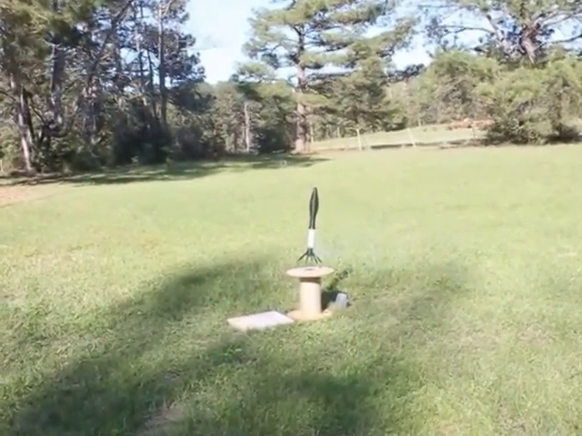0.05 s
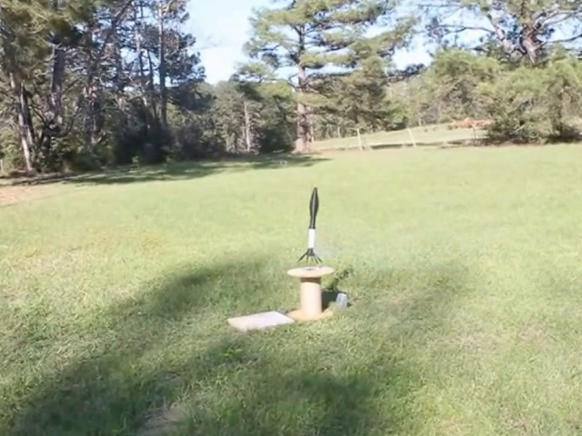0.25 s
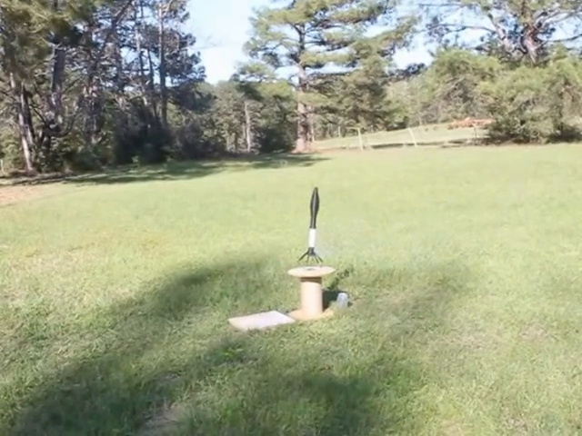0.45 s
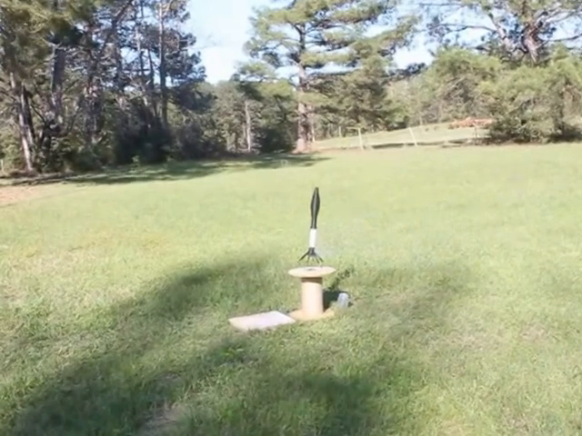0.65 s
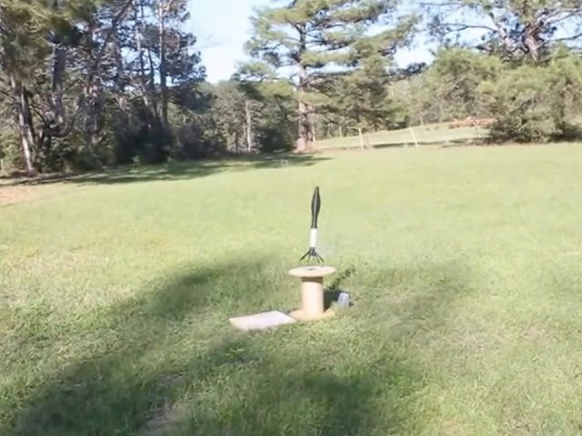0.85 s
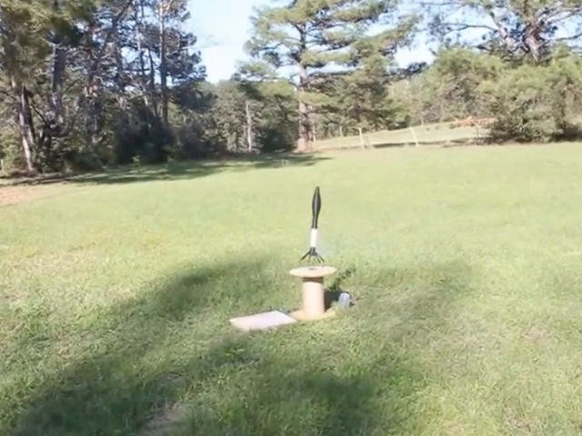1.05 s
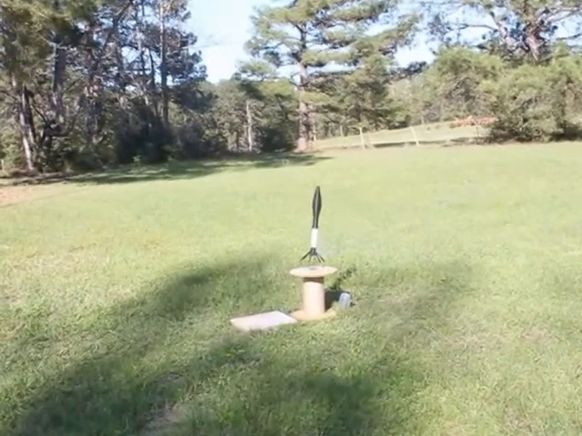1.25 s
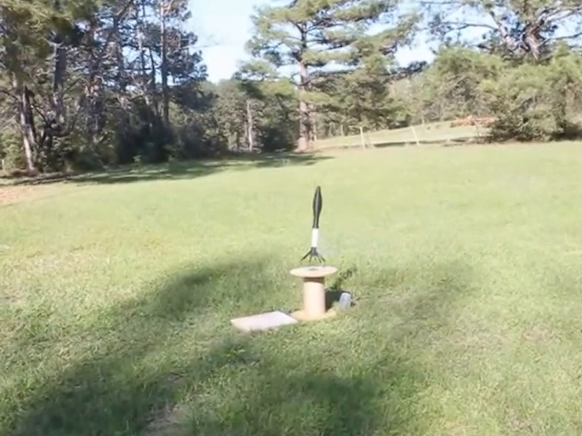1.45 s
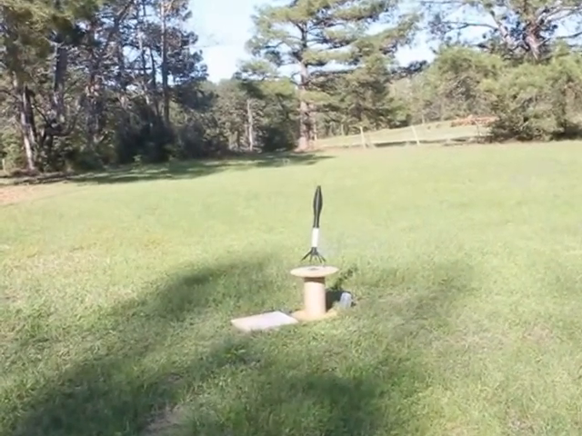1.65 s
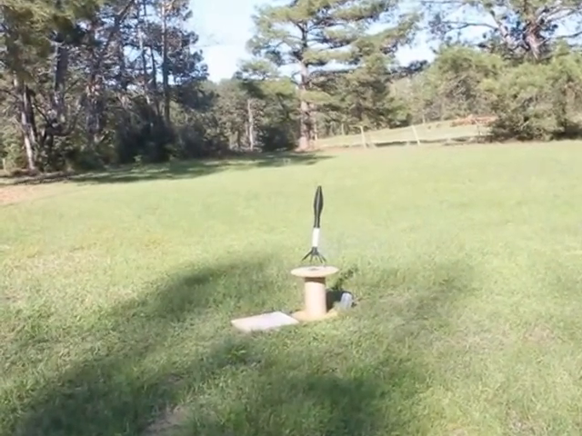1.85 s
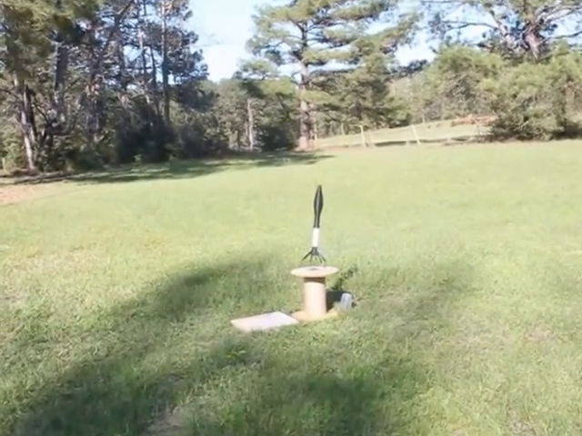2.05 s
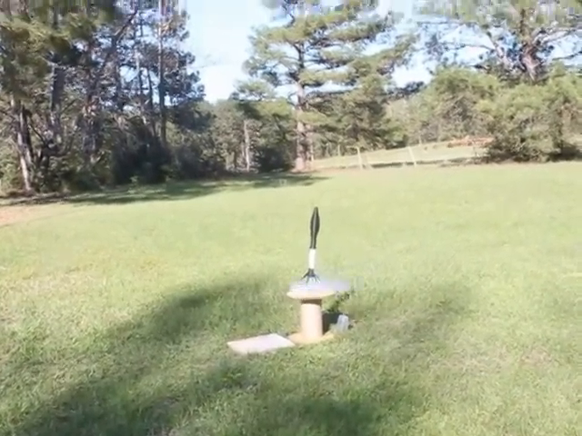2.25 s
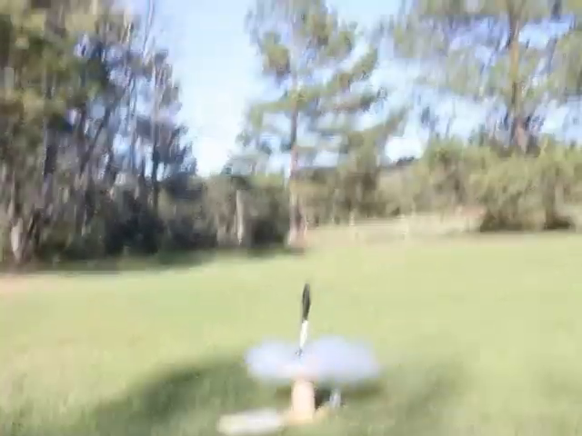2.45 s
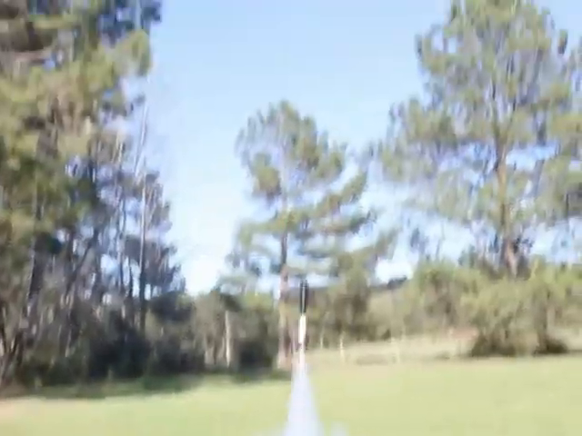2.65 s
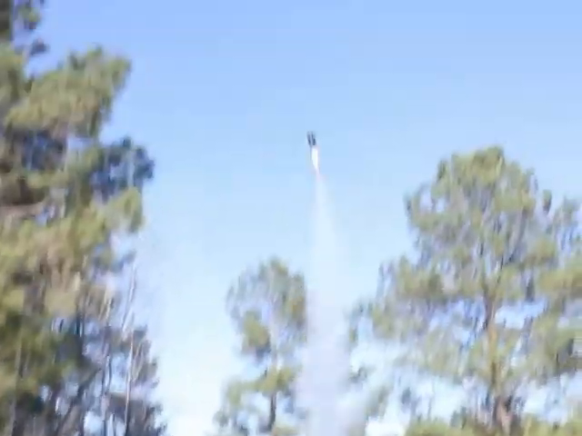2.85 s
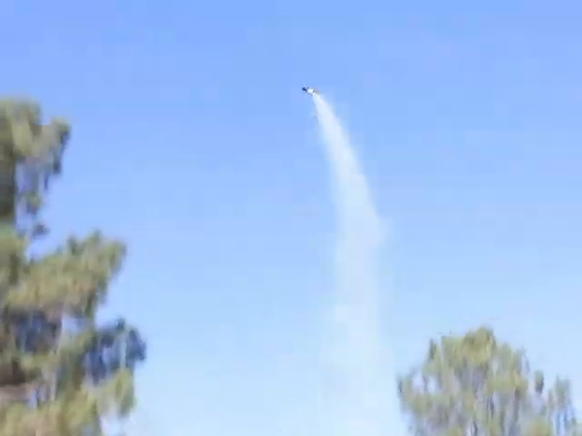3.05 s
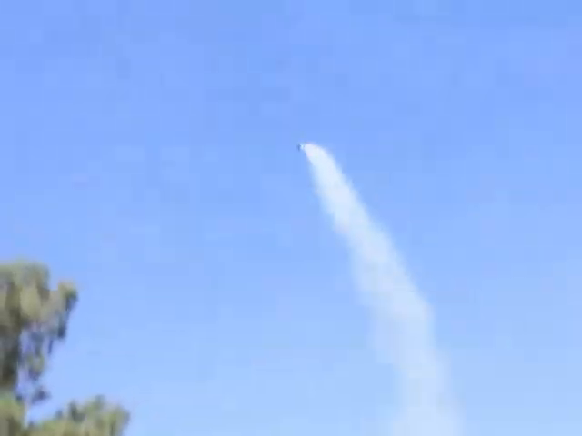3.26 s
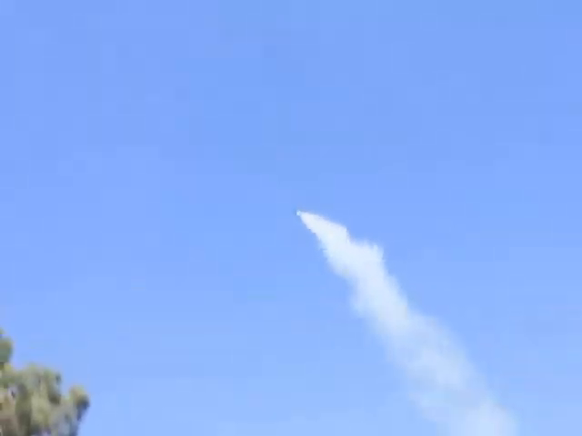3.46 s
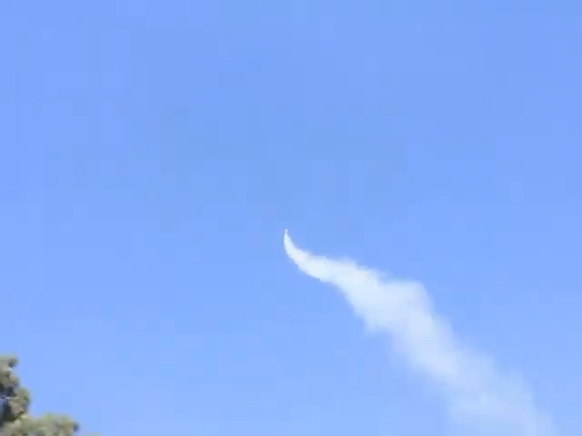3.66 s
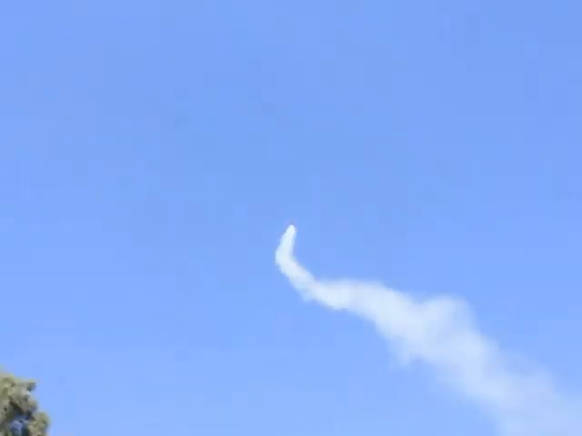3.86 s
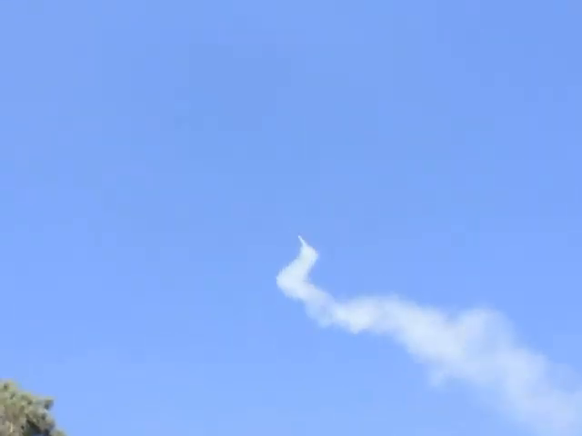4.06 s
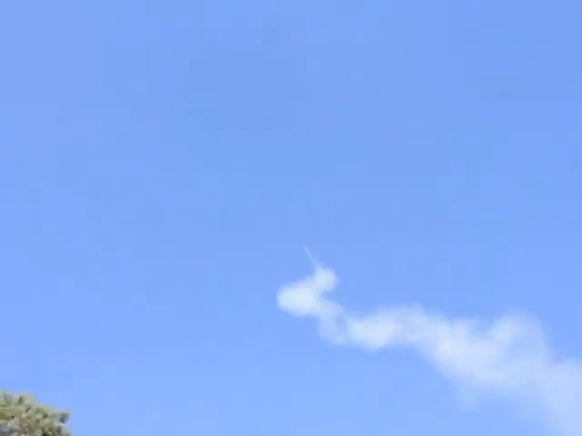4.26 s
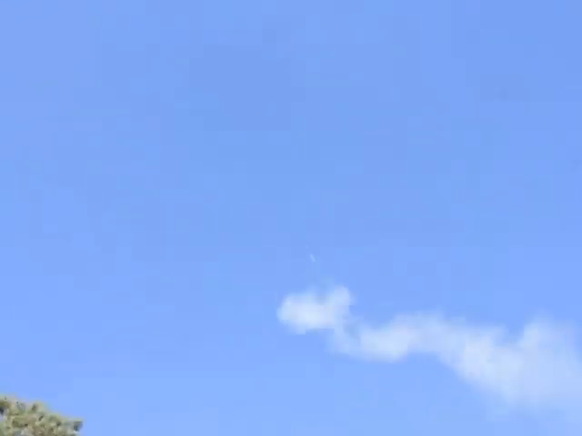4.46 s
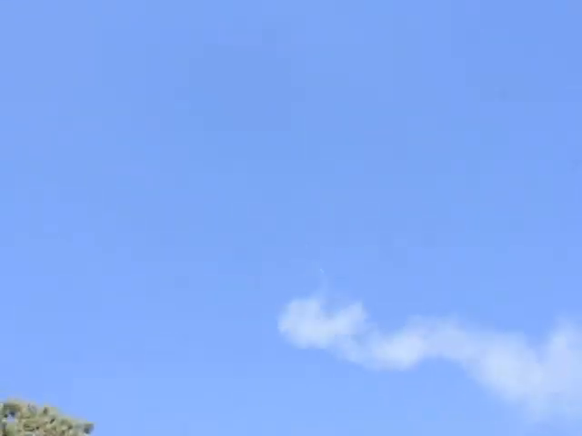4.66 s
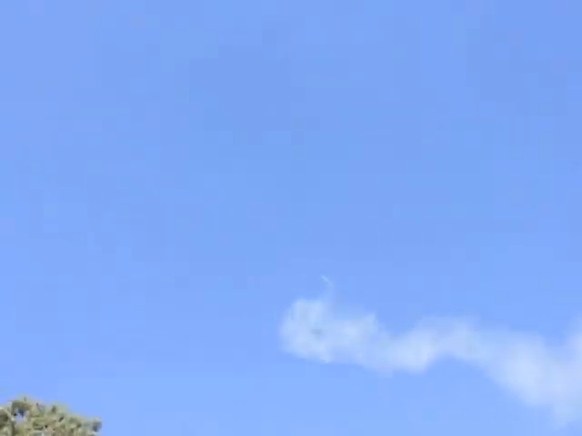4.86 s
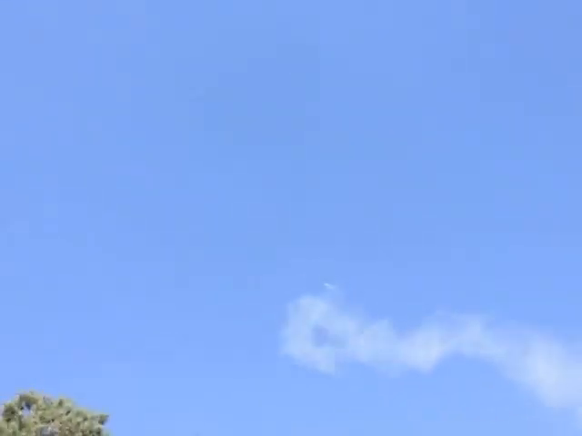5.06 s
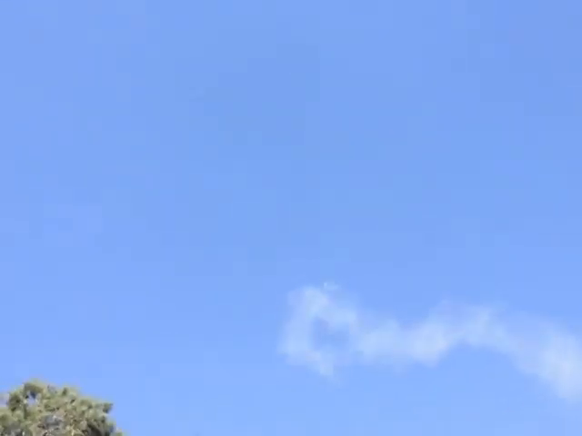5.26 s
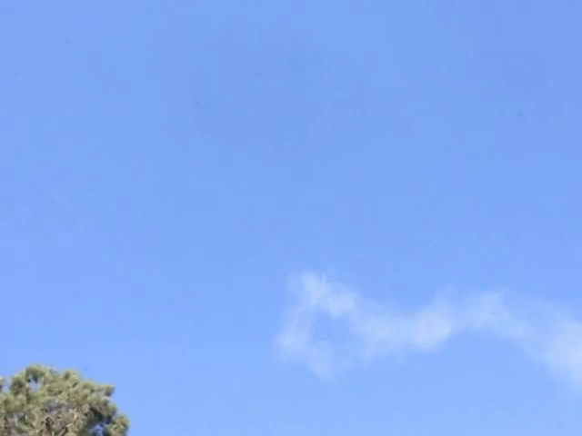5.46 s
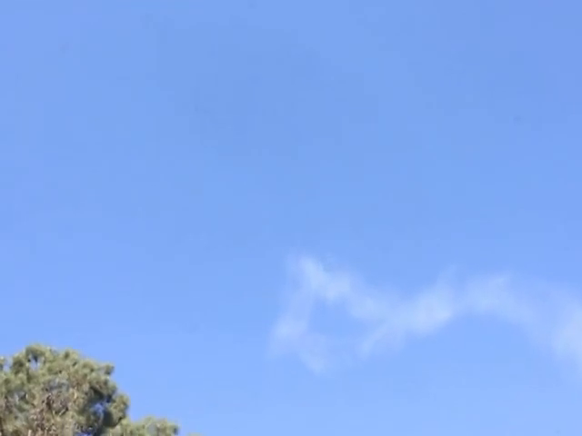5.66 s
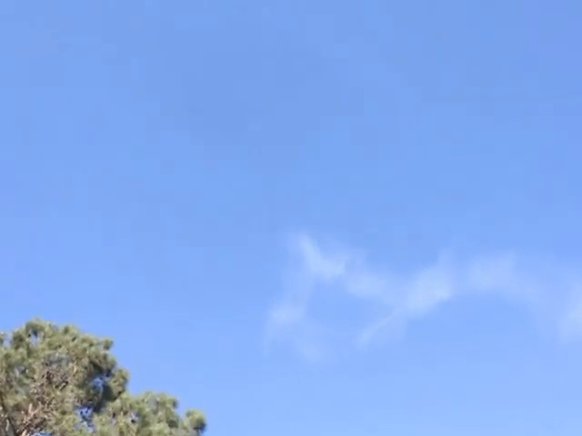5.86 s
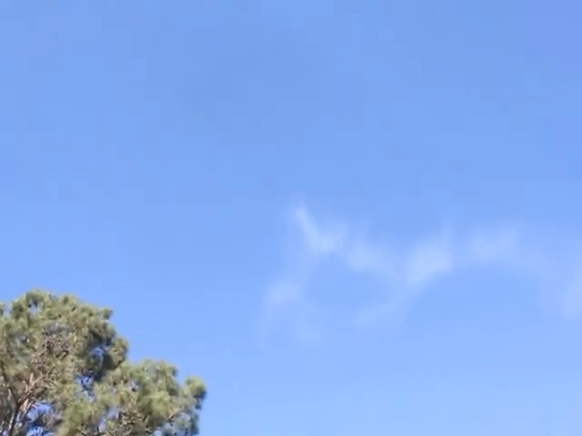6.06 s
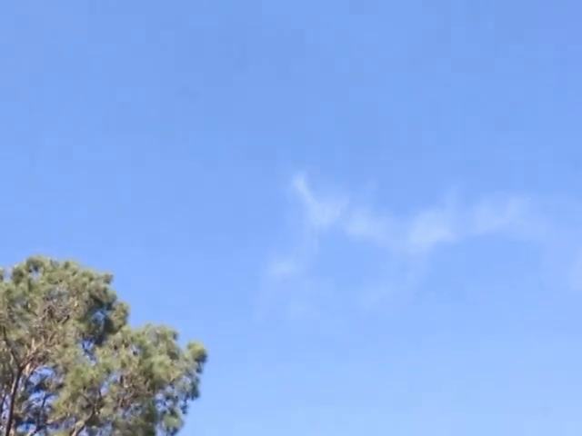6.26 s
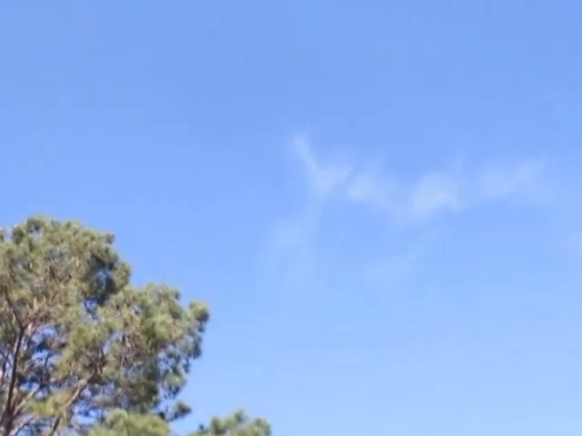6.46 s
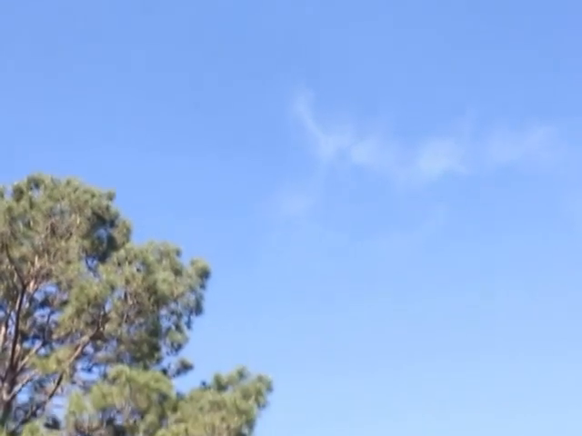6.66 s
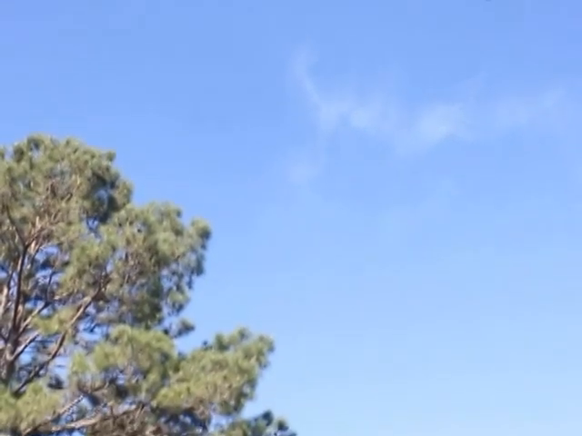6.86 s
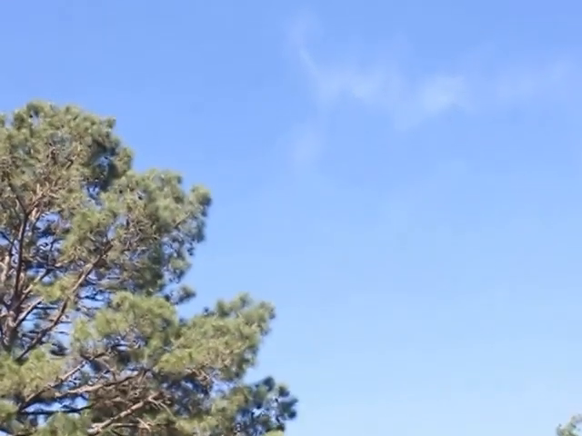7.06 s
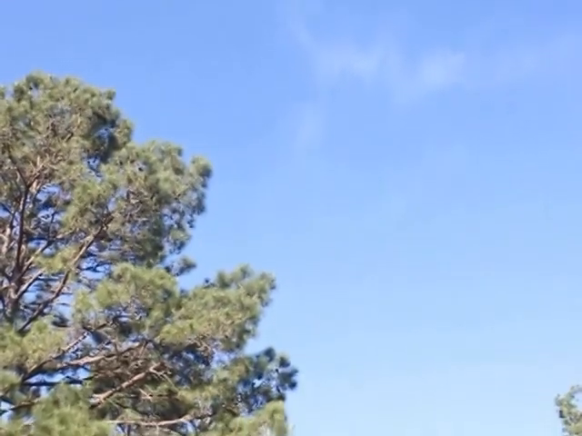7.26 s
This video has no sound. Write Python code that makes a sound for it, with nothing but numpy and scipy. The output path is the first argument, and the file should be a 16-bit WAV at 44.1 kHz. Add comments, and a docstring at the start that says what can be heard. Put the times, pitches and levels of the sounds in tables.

```python
"""A meadow: insects shrill in the grass, trees rustle, gusts buffet the microphone, camera electronics buzz.
At about 2.1 s a small rocket motor lights on its pad, roars, lifts off with low whooshes and hisses away.
The meadow sinks under the burn; a softer roar returns from the tree line and the meadow climbs back.
Near branches swell late on and two taps knock the camera. Shaped noise makes all but the buzz, a repeated
cycle of partials, and the knocks, clicks ringing resonances."""
import sys
import numpy as np
from scipy import signal
from scipy.fft import rfft, irfft, next_fast_len
from scipy.io import wavfile

SR = 44100
rng = np.random.default_rng(int(sys.argv[2]) if len(sys.argv) > 2 else 0)


def dump(signal):
    """Clip the signal to [-1, 1] and save it as 16-bit WAV at the path in sys.argv[1]."""
    limited = np.clip(np.atleast_2d(signal).T, -1, 1)
    pcm = np.round(limited * 32767).astype(np.int16)
    wavfile.write(sys.argv[1], SR, pcm)


N = 322756

# Start and end of lift-off: the roar trades its pad colour for that of the free jet [t/s, t/s]
LIFT_OFF_SPAN = (2.45, 2.73)
MEADOW_BACK_S = 5.24   # the meadow is back at full level


def from_db(db):
    """Decibels to gain."""
    return 10 ** (np.asarray(db) / 20)


def rms_one(x):
    """Scale to unit rms."""
    return x / np.sqrt(np.mean(x ** 2) + 1e-20)


def seconds():
    """Time of every sample."""
    return np.arange(N) / SR


def in_time(rows, **ends):
    """Columns of a curve table, sample by sample."""
    times, *columns = np.transpose(rows)
    return [np.interp(seconds(), times, column, **ends) for column in columns]


def at_hz(points, hz):
    """A spectrum read on a log-frequency axis."""
    point_hz, point_db = np.transpose(points)
    return np.interp(np.log(hz), np.log(point_hz), point_db)


def drift(corner_hz):
    """Slow chance with spread 1: noise through two equal low-pass poles, made at SR / 40."""
    r = np.exp(-80 * np.pi * corner_hz / SR)
    noise = rng.standard_normal(N // 40 + 2002)
    slow = signal.lfilter([1], [1, -2 * r, r * r], noise)[2000:]   # drop the start-up
    return np.interp(np.arange(N) / 40, np.arange(len(slow)), rms_one(slow))


def coloured(spectrum, echoes=(), gain=1):
    """Noise shaped by a gain in time, then by a spectrum and short echoes; rms 1."""
    size = next_fast_len(N)
    hz = np.arange(size // 2 + 1) * SR / size + 1
    paths = 1   # the direct sound
    for delay_ms, strength, shift_rad in echoes:
        paths = paths + strength * np.exp(-1j * (2 * np.pi * hz * delay_ms / 1000 + shift_rad))
    noise = rfft(gain * rng.standard_normal(N), size)
    return rms_one(irfft(noise * from_db(at_hz(spectrum, hz)) * paths, size)[:N])


def swells(rows, rise, sag, fall):
    """Power of (s, hold s, dB) swells: each climbs, sags while held, then drops, at rates in dB per s."""
    power = 0
    for start_s, hold_s, db in rows:
        t = seconds() - start_s
        climb_db = rise * np.minimum(t, 0)
        sag_db = sag * np.clip(t, 0, hold_s)
        drop_db = fall * np.maximum(t - hold_s, 0)
        power = power + from_db(2 * (db + climb_db - sag_db - drop_db))
    return power


def tilt():
    """0 while the camera looks along the field, 1 once it looks up."""
    # Start and end of the tilt [t/s, t/s]
    tilt_span = (2.2, 4.3)
    return np.interp(seconds(), tilt_span, [0, 1])


def sink():
    """Gain of everything but the rocket: down quickly under the burn, back up at a steady rate."""
    start_s, over_s, sunk_db = 2.3, 0.07, -22.5
    return_db_per_s = 17.0
    down_db = sunk_db * np.clip((seconds() - start_s) / over_s, 0, 1)
    back_db = np.minimum(return_db_per_s * (seconds() - MEADOW_BACK_S), 0)
    return from_db(np.maximum(down_db, back_db))


def insects():
    """Each singer throbs at its own slightly wandering rate, with its own wing resonance, and swells at random."""
    # Singers in the grass [throb rate/Hz, throb depth 0-1, relative level/dB, wing resonance f/Hz,
    # level change over the tilt/dB]
    singers = [(59.1, 0.13, 0.5, 9540, -1.5), (67, 0.03, -3.5, 9350, 3), (60, 0.2, 4, 9000, -2),
               (61.5, 0.5, -6.5, 9750, 6)]
    # Colour of the song before the wing resonances [f/Hz, relative level per Hz/dB]
    song_colour = [(4290, -69), (7300, -39.5), (7820, -18.5), (8400, -6), (8560, -2.5), (8730, -2.5),
                   (9330, 3), (9880, 2), (10600, -10.5), (10800, -19), (11100, -30), (11500, -47),
                   (15000, -74), (22000, -120)]
    early_db, late_db = -31, -35   # chorus before and after the tilt
    fade_db_per_s = 1.1   # the chorus slackens once it is back
    chorus = 0
    for throb_hz, depth, db, wing_hz, change_db in singers:
        wandering_hz = throb_hz * (1 + 0.0032 * drift(1.0))
        phase = 2 * np.pi * (np.cumsum(wandering_hz) / SR + rng.random())
        swell = from_db(0.8 * drift(1.3))
        rasp = coloured(song_colour, gain=swell * (1 + depth * np.sin(phase)) ** 2)
        ring = signal.lfilter(*signal.iirpeak(wing_hz, 60.0, SR), rasp)
        chorus = chorus + from_db(db + change_db * tilt()) * (rasp + 1.55 * ring)
    fade_db = fade_db_per_s * np.maximum(seconds() - MEADOW_BACK_S, 0)
    return from_db(early_db + (late_db - early_db) * tilt() - fade_db) * rms_one(chorus)


def rustle():
    """Leaves and faint hiss as noise; the colour changes as the camera tilts up and near branches come forward."""
    # Trees and faint hiss, camera along the field [f/Hz, relative level per Hz/dB]
    early_colour = [(40, -45), (120, -29), (200, 2), (419, -4.5), (567, -6), (1320, -6), (2280, -11.5),
                    (3860, -22), (4300, -15.5), (6170, -23.5), (7400, -24), (11500, -26), (13000, -34),
                    (15500, -39)]
    # The same, camera tilted to the sky [f/Hz, relative level per Hz/dB]
    late_colour = [(40, -63), (120, -3), (200, -3), (339, -5), (621, -9), (879, -8), (1230, -9.5),
                   (1560, -7.5), (2420, -11.5), (4700, -21.5), (7400, -30), (11000, -27), (14500, -31.5),
                   (15500, -33)]
    # Near branches [f/Hz, relative level per Hz/dB]
    leaf_colour = [(1000, -18), (1800, -6), (2400, -1), (3300, -11.5), (4800, -8.5), (7000, -25)]
    # Swells in near branches [t/s, hold/s, level/dB]
    leaf_swells = [(6.36, .02, -43), (6.48, .03, -43.5), (6.7, 0.022, -39)]
    early_db, late_db, near_db = -40, -37, -48.5
    early = from_db(early_db) * coloured(early_colour)
    late = from_db(late_db) * coloured(late_colour)
    near_power = from_db(2 * near_db) + swells(leaf_swells, rise=82, sag=0, fall=74)
    near = np.sqrt(near_power) * coloured(leaf_colour)
    flutter = from_db(0.27 * drift(22.0))
    return flutter * (np.sqrt(1 - tilt()) * early + np.sqrt(tilt()) * (late + near))


def wind():
    """Lumpy low noise on the microphone: a light breeze with gusts on top."""
    # Gusts, before the lumpiness [t/s, hold/s, level at the start of the hold/dB]
    gusts = [(0.03, .03, -33.5), (0.2, 0.16, -34.5), (0.45, .03, -38.5), (1.04, .15, -41.5),
             (1.24, .05, -34), (1.32, .2, -27), (1.58, 0.23, -23.5), (1.96, .36, -25.5), (5.24, .03, -55),
             (6.1, 0.056, -37.5), (6.69, .04, -48), (7.23, .09, -39)]
    # Wind on the microphone [f/Hz, relative level per Hz/dB]
    wind_colour = [(12, -40), (40, -7), (75, -1), (105, 0), (150, -2), (220, -11), (400, -26), (700, -47),
                   (1500, -90)]
    breeze_db = -49
    power = from_db(2 * breeze_db) + swells(gusts, rise=175, sag=32, fall=220)
    return np.sqrt(power) * from_db(1.55 * drift(7.9)) * coloured(wind_colour)


def buzz():
    """Camera electronics repeat one cycle: uneven partials on a single pitch, recoloured over the tilt."""
    # Strongest partials before the tilt [f/Hz, rms level/dB]
    strong_lines = [(877.5, -59), (1055, -58), (1174, -58), (1292, -60), (1879, -59), (1933, -62),
                    (2466, -62), (2638, -60), (2756, -65), (2993, -62), (3225, -68), (3343, -69),
                    (3580, -70), (4048, -67), (4339, -59), (4457, -68), (4635, -68), (4807, -65),
                    (4985, -63), (5163, -66), (5690, -71), (5922, -70), (6977, -74), (7214, -71)]
    # Weaker partials, before a random scatter [f/Hz, rms level/dB]
    weak_lines = [(800, -64.5), (3000, -70), (7000, -80), (11000, -87), (15500, -96)]
    # Change of colour after the tilt, besides the overall change [f/Hz, level change/dB]
    late_change = [(800, -0.7), (2500, 1.5), (4500, -5), (7500, -1), (12000, -3), (15500, 6)]
    pitch_hz, late_db, scatter_db = 58.646, 2, 3.0
    multiple = np.arange(14, 265)
    scatter = scatter_db * rng.standard_normal(len(multiple))
    early_levels = at_hz(weak_lines, multiple * pitch_hz) + scatter
    for hz, line_db in strong_lines:
        early_levels[multiple == round(hz / pitch_hz)] = line_db
    late_levels = early_levels + at_hz(late_change, multiple * pitch_hz) + late_db
    turn = np.linspace(0, 1, 8193)   # one cycle
    start_phase = rng.random((len(multiple), 1))
    partials = np.sin(2 * np.pi * (np.outer(multiple, turn) + start_phase))
    position = np.arange(N) * pitch_hz / SR % 1
    early = np.interp(position, turn, from_db(early_levels) @ partials)
    late = np.interp(position, turn, from_db(late_levels) @ partials)
    return np.sqrt(2) * ((1 - tilt()) * early + tilt() * late)   # root 2 turns peak into rms


def hiss(hiss_db, sputter):
    """Jet hiss: a hump of noise whose centre wanders, mostly upward, as the nozzle turns to the listener."""
    # Centre of the hump [t/s, f/Hz]
    hiss_centre = [(2.2, 7660), (2.39, 10200), (2.53, 8160), (2.78, 7700), (2.9, 10400), (3.45, 12000),
                   (3.85, 12100), (4.08, 8300), (4.14, 12000)]
    below_oct, above_oct = 0.22, 0.38   # width of the peak either side of its centre
    air_loss_hz = 14800   # above this the air dulls the hiss
    centre_hz, = in_time(hiss_centre)
    edges = 2500 * 2 ** np.arange(0, 2.8, 0.14)
    white = rng.standard_normal((2, N))
    hump, power = 0, 0
    for k, (low, high) in enumerate(zip(edges, edges[1:])):
        octaves = np.log2(np.sqrt(low * high) / centre_hz)
        off = octaves / np.where(octaves < 0, below_oct, above_oct)
        shape = np.exp(-off ** 2) + 0.74 / (1 + (octaves / 0.92) ** 2)   # a peak on a broad skirt
        band_pass = signal.butter(2, [low, high], "band", fs=SR, output="sos")
        band = signal.sosfilt(band_pass, white[k % 2])   # neighbouring bands use separate noise
        hump = hump + shape * band * from_db(1.8 * drift(33))
        power = power + shape ** 2 * band.var()
    levelled = from_db(hiss_db + 0.61 * sputter) * hump / np.sqrt(power)
    return signal.sosfilt(signal.butter(2, air_loss_hz, fs=SR, output="sos"), levelled)


def roar(roar_db, hiss_db, sputter):
    """Broad jet noise: a blast echoing off ground and stand gives way to the free jet and a low roar."""
    # Blast on the pad [f/Hz, relative level per Hz/dB]
    blast_colour = [(120, -44), (280, -6), (500, -20.5), (800, -4.5), (1500, 5), (2300, 4.5), (2800, 0.5),
                    (3400, -1.5), (4150, -0.5), (5200, -5), (7000, -12), (15500, -22)]
    # Echoes off ground and stand [delay/ms, strength, phase shift/rad]
    pad_echoes = [(1.366, 0.44, -0.56), (0.436, 0.23, 0.22)]
    # Free jet [f/Hz, relative level per Hz/dB]
    free_colour = [(650, -24), (1300, -9.5), (1830, 0.5), (2940, -0.5), (7000, -3.5), (10000, -15.5),
                   (15500, -22)]
    # Low part of the free jet [f/Hz, relative level per Hz/dB]
    low_colour = [(120, -43), (200, -17), (916, -5), (1110, -3.5), (1360, -8.5), (1700, 0), (2210, -22),
                  (3740, -120)]
    pad_boost_db = 1.5   # stronger while the jet strikes the stand
    low_offset_db, low_follows = -6.5, 0.35   # the low part gains as roar outgrows hiss (dB per dB)
    low_ends_s, low_fade_s = 4.02, 0.05   # its fade starts at the first and lasts the second
    ground = [(8.2, 0.2, 0)]   # ground echo: delay ms, strength, phase shift rad
    low_db = roar_db + low_offset_db + low_follows * (roar_db - hiss_db)
    low_gain = from_db(low_db) * np.clip((low_ends_s - seconds()) / low_fade_s + 1, 0, 1)
    aloft = np.interp(seconds(), LIFT_OFF_SPAN, [0, 1])
    on_pad = from_db(roar_db + pad_boost_db) * coloured(blast_colour, pad_echoes)
    free = from_db(roar_db) * coloured(free_colour, ground)
    low = low_gain * coloured(low_colour, ground)
    return from_db(0.49 * sputter) * (np.sqrt(1 - aloft) * on_pad + np.sqrt(aloft) * (free + low))


def jet():
    """The burning motor: roar and hiss follow their own level curves and sputter together."""
    # The burn, before sputter and colour changes [t/s, roar level/dB, hiss level/dB]
    burn = [(2.135, -49, -43), (2.16, -27, -30), (2.18, -21.5, -21.5), (2.22, -18.5, -21),
            (2.25, -18.5, -29), (2.29, -13, -26), (2.37, -15, -25.5), (2.4, -14.5, -18.5),
            (2.49, -20, -16.5), (2.53, -21, -8.5), (2.58, -16, -14), (2.66, -16, -9.5), (2.96, -19.5, -8),
            (3.19, -24.5, -15.5), (3.34, -21, -23.5), (3.43, -20, -14), (3.51, -25.5, -13),
            (3.74, -26.5, -12.5), (3.85, -29.5, -27.5), (3.97, -33.5, -35.5), (4.12, -40.5, -49),
            (4.14, -39.5, -40), (4.25, -41.5, -50), (4.36, -45.5, -70), (4.55, -62, -90)]
    roar_db, hiss_db = in_time(burn, left=-120, right=-120)
    sputter = drift(36) + 1.3 * drift(34.0)
    return hiss(hiss_db, sputter) + roar(roar_db, hiss_db, sputter)


def thrum():
    """Low whooshes of lift-off: a narrow noise band whose centre rises as the rocket leaves the pad."""
    # Whooshes [t/s, hold/s, level/dB]
    whooshes = [(2.41, 0.032, -31.5), (2.59, 0.021, -34), (2.834, 0.027, -37)]
    start_hz, glide_hz_per_s = 264.5, 99   # centre at the start of lift-off, and its climb
    centre_hz = np.clip(start_hz + glide_hz_per_s * (seconds() - LIFT_OFF_SPAN[0]), 100, 600)
    carrier = np.exp(2j * np.pi * np.cumsum(centre_hz) / SR)
    low_pass = signal.butter(2, 70.0, fs=SR, output="sos")
    a, b = signal.sosfilt(low_pass, rng.standard_normal((2, N)))
    band = rms_one(a * carrier.real + b * carrier.imag)   # slow noise moved up to the centre
    return np.sqrt(swells(whooshes, rise=120, sag=0, fall=104)) * band


def tree_echo():
    """The burn returning from the tree line, as separate coloured noise on a level curve."""
    # Return from the trees [t/s, level/dB]
    echo_curve = [(4.0, -58), (4.42, -43.5), (4.48, -43), (4.57, -41), (4.61, -45.5), (5.0, -46.5),
                  (5.25, -59)]
    # Its colour [f/Hz, relative level per Hz/dB]
    echo_colour = [(700, -22), (1500, -7), (2100, -0.5), (2800, -6.5), (5000, -14), (8000, -36)]
    echo_db, = in_time(echo_curve, left=-120, right=-120)
    return from_db(echo_db) * coloured(echo_colour)


def knock():
    """Taps on the camera: each click rings the decaying resonances of its shell."""
    # Clicks that strike the shell [t/s, click level/dB]
    taps = [(6.634, -29), (6.685, -21)]
    # Shell resonances [f/Hz, relative level/dB, 60 dB decay time/s]
    shell_modes = [(260, -0.5, 0.018), (480, -2, .015), (830, 1, .025), (1700, -7, .012), (2380, -5, .015),
                   (3100, -9, .01)]
    click = np.full(N, 1e-18)   # not quite zero, to keep the filters fast
    for tap_s, tap_db in taps:
        click[round(tap_s * SR)] = from_db(tap_db)
    ringing = 0
    for hz, db, t60_s in shell_modes:
        r = from_db(-60 / (t60_s * SR))
        w = 2 * np.pi * hz / SR
        ring = signal.lfilter([0, np.sin(w)], [1, -2 * r * np.cos(w), r * r], click)
        ringing = ringing + from_db(db) * rng.choice([-1, 1]) * ring
    return ringing


def scene():
    """One microphone feeds both channels."""
    meadow = insects() + rustle() + wind() + buzz() + knock()
    rocket = jet() + thrum() + tree_echo()
    mono = rocket + sink() * meadow
    return np.array([mono, mono])


def record(dry):
    """The deepest bass is lost, peaks are rounded, the top is cut."""
    low_cut_hz, top_hz = 35, 15745
    thin = signal.sosfilt(signal.butter(2, low_cut_hz, "high", fs=SR, output="sos"), dry)
    rounded = 0.8 * np.tanh(thin / 0.8)
    return signal.sosfilt(signal.ellip(14, 0.3, 75, top_hz, fs=SR, output="sos"), rounded)


dry = scene()
out = record(dry)
dump(out)
```